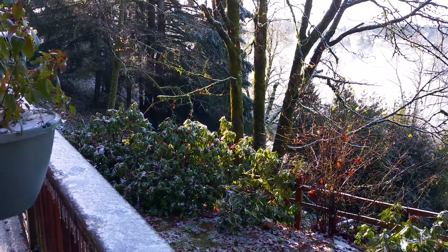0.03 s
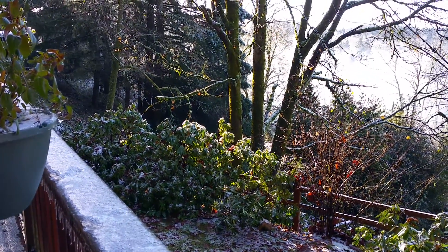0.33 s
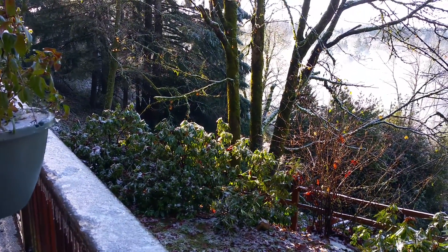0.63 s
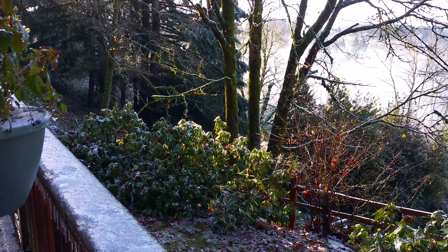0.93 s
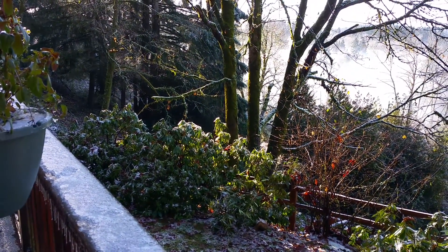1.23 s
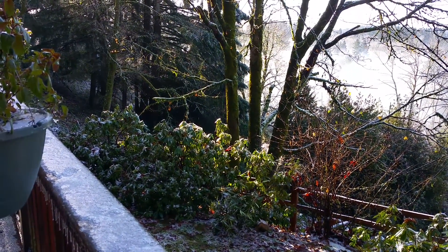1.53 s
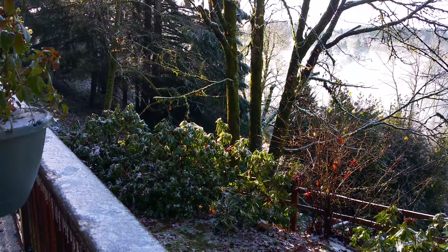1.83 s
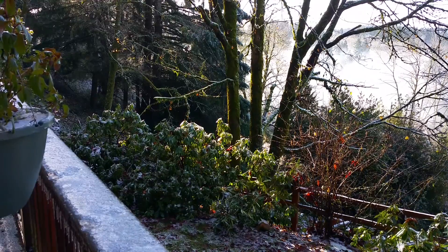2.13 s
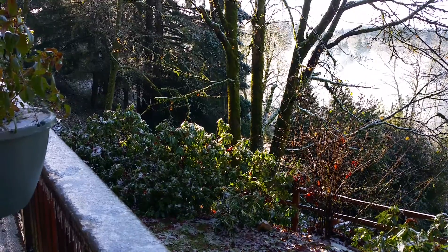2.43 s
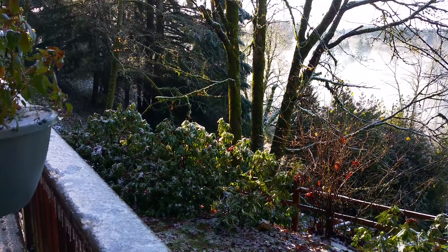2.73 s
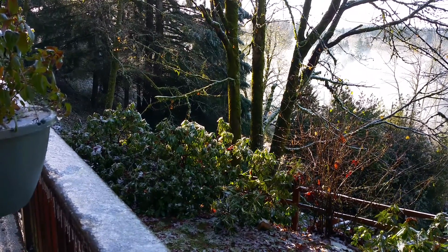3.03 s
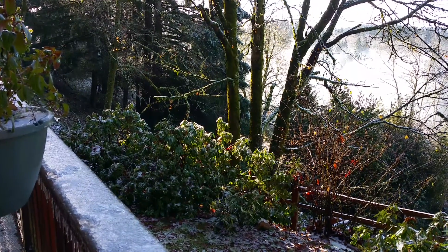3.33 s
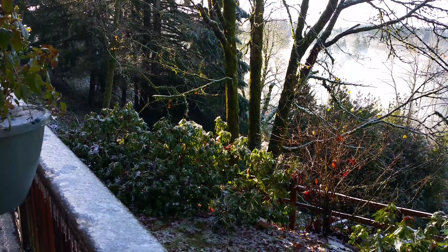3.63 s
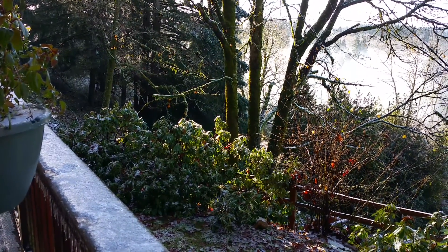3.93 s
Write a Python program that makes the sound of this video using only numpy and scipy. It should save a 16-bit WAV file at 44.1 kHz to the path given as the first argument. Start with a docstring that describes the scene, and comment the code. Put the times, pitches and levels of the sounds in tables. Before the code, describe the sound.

Uneven drops of water splash near the microphone outdoors, each with a short echo, growing louder in the second half. Underneath run a low engine hum, a pulsing faraway propeller plane, soft air rumble and faint pattering.

```python
"""A wooden deck above a lake, during a thaw. Meltwater drips close by on the right: each drop smacks
down, throws spray and traps ringing bubbles, and the house wall sends back a short echo.
Behind it are a fine patter from the trees and the low rumble of open air. An engine hums steadily some
way off, and a slowly sinking drone, like a far propeller plane, beats (pulses) against its hum."""
import sys
import numpy as np
from scipy import signal
from scipy.fft import rfft, irfft
from scipy.io import wavfile
from scipy.ndimage import uniform_filter1d

SR = 44100
rng = np.random.default_rng(int(sys.argv[2]) if len(sys.argv) > 2 else 0)


def file_out(sig):
    """Save sig as 16-bit WAV at sys.argv[1]."""
    # one column per channel
    cols = np.atleast_2d(sig).T
    # limit, then scale
    lim = np.clip(cols, -1, 1)
    pcm = np.round(lim * 32767).astype(np.int16)
    wavfile.write(sys.argv[1], SR, pcm)


N = 176400
T = np.arange(N) / SR
BUBBLE_RISE = 6  # the larger this is, the faster a bubble's pitch climbs

# Tone colour of a splash, near or far: (frequency [Hz], relative level [dB])
SPLASH_COLOUR = [(400, -20), (1300, -11), (2300, 1.5), (3300, -1), (4500, -1), (6000, 3), (7400, 2),
                 (8500, -2), (11000, -5), (14000, -9.5), (16000, -16)]


def undb(db):
    """Turn decibels into a number to multiply by."""
    return 10 ** (np.asarray(db) / 20)


def level(x, db):
    """Scale a sound to an average (rms) level."""
    return x * undb(db) / np.sqrt(np.mean(x ** 2))


def pan(db):
    """Left and right gains; positive decibels favour the left."""
    return undb(np.array([[db], [-db]]) / 2)


def wander(rate_hz):
    """A smooth random curve that strays about 1 either side of zero."""
    hold = int(SR / rate_hz)
    steps = np.repeat(rng.standard_normal(N // hold + 2), hold)
    return level(uniform_filter1d(uniform_filter1d(steps, hold), hold)[:N], 0)


def colour(x, points, tilt_db=0, ripple_db=0, slap_db=0):
    """Shape a sound's tone along (Hz, dB) points; white noise keeps its overall level."""
    n = x.shape[-1]
    bins = np.fft.rfftfreq(n, 1 / SR)
    octave = np.log2(np.maximum(bins, 1))
    hz, db = np.array(points).T
    ripple = ripple_db * np.interp(bins / 600, np.arange(64), rng.standard_normal(64))
    slap = slap_db * np.exp(-.5 * ((octave - np.log2(6250)) / .17) ** 2)  # ring of a slapped wet surface
    tilt = tilt_db * np.maximum(octave - np.log2(6000), -2)
    gain = level(undb(np.interp(octave, np.log2(hz), db) + ripple + slap + tilt), 0)
    # make the filter ring after each hit, never before it
    cepstrum = irfft(np.log(gain), n) * (1 + np.sign(np.fft.fftfreq(n)))
    return irfft(rfft(x) * np.exp(rfft(cepstrum)), n)


def wide_noise(points, wide_hz=585):
    """Shaped noise, alike in both ears in the bass and unrelated higher up."""
    mid, side = rfft(rng.standard_normal((2, N)))
    side = side * np.clip(np.fft.rfftfreq(N, 1 / SR) / wide_hz, .08, 1)
    return colour(irfft(np.array([mid + side, mid - side]), N), points)


def water_noise(size, share=.045):
    """White noise of which the two ears share a little."""
    left, right, both = rng.standard_normal((3, size))
    return np.sqrt(1 - share) * np.array([left, right]) + np.sqrt(share) * both


def bursts(hits, decay_s):
    """Turn each hit into a puff of noise that dies away."""
    return signal.lfilter([1], [1, -np.exp(-1 / (decay_s * SR))], hits) * water_noise(len(hits))


def droplets(size, per_s, spread_db):
    """A shower of tiny droplets landing at random, a few harder than the rest."""
    lands = rng.random(size) < per_s / SR
    strength = undb(spread_db * np.minimum(rng.exponential(size=size), 5))
    return level(bursts(lands * strength, decay_s=.00077), 0)


def air(db=-37.5):
    """Low outdoor rumble that wavers a little."""
    # Tone colour of the open air: (frequency [Hz], relative level [dB])
    air_colour = [(20, -10), (38, -12), (60, -12), (100, -1.5), (150, -2), (220, 2.5), (290, -3), (400, -6),
                  (520, -12), (800, -13.5), (1050, -15.5), (1350, -21), (1700, -20), (2100, -18),
                  (2600, -19.5), (3200, -32), (6000, -32.5), (16000, -57.5)]
    return undb(db + wander(6.3)) * wide_noise(air_colour)


def tree_patter(drips_per_s=69):
    """Meltwater falling from the trees: a hiss, a fine patter and small bright drips."""
    # Tone colour of the hiss and patter: (frequency [Hz], relative level [dB])
    melt_colour = [(1000, -11), (2200, -4.5), (3300, 2), (4600, 0.5), (5600, -0.5), (7300, -2), (8300, -10),
                   (11000, -9), (14000, -19), (16000, -22)]
    hiss = undb(-50 + .43 * wander(4.3)) * water_noise(N)
    patter = undb(-59) * droplets(N, per_s=250, spread_db=1.5)
    hits = (rng.random(N) < drips_per_s / SR) * rng.uniform(.38, 1, N)
    far_drips = level(bursts(hits, decay_s=.0091), -60)
    return colour(hiss + patter, melt_colour) + colour(far_drips, SPLASH_COLOUR, tilt_db=6)


def plane():
    """Propeller blades make sinking tones that fade in and out, over a roar that swells twice."""
    # How often a blade sweeps past: (time [s], rate [Hz])
    blade_rate = [(0, 96.1), (1, 94.5), (2, 93.04), (3, 91.82), (4, 90.55)]
    # Tones at 1, 2 and 3 times that rate: (time [s], first [dB], second [dB], third [dB])
    tone_levels = [(0, -28.5, -50, -67), (.5, -24.5, -44.5, -38), (1, -27.5, -37, -46),
                   (1.4, -29.5, -69, -40), (1.85, -25, -66, -39), (2.3, -28.5, -56, -44.5),
                   (2.7, -28, -62, -45), (3.3, -31, -51, -41.5), (3.75, -29, -37.5, -35.5),
                   (4, -30.5, -36, -38)]
    # Swells of the roar: (peak time [s], half width [s], level [dB])
    swells = [(0.555, 0.16, -36), (3.73, 0.18, -36.5)]
    # Tone colour of the roar: (frequency [Hz], relative level [dB])
    roar_colour = [(60, -25), (140, -10), (220, -3), (330, -13.5), (480, -11.5), (750, -20.5),
                   (1200, -30.5), (3000, -52)]
    phase = 2 * np.pi * np.cumsum(np.interp(T, *np.array(blade_rate).T)) / SR
    times, *levels = np.array(tone_levels).T
    tones = sum(undb(np.interp(T, times, db)) * np.sin((k + 1) * phase + .28 * k * wander(9.8))
                for k, db in enumerate(levels))
    shaft = undb(-51.5) * np.sin(phase * 2 / 3)  # twice per turn of the three-bladed propeller
    swell = sum(undb(db) * np.exp(-.5 * ((T - at) / width) ** 2) for at, width, db in swells)
    return np.sqrt(2) * (tones + shaft) + swell * wide_noise(roar_colour)


def engine_hum(shaft_hz):
    """Wavering tones at multiples of the shaft's rate; reflections shift the high ones between ears."""
    # Engine tones: (multiple of the shaft rate [rounded below], level [dB], left minus right [dB])
    tones = [(2, -46.5, 13), (3, -38, 3), (4, -45.5, 7.5), (5, -36.5, 3), (6, -35.5, -1), (7, -44.5, 3),
             (8, -48, 4), (9, -35.5, 3.5), (10, -40.5, 3), (11, -49, 9.5), (12, -42.5, 4), (13, -48, 10),
             (14, -53.5, -5.5), (15, -59.5, 6), (17, -58, -2), (18, -55, 8), (19, -53.5, -2),
             (22, -56.5, 4), (25, -60, 10.5), (26, -58, -1), (36, -55, 2), (51, -66.5, 18.5),
             (67.74, -60.5, 8.5)]
    out = 0
    for multiple, db, pan_db in tones:
        multiple = round(multiple)
        hz = multiple * shaft_hz
        scatter = min(hz / 650, 1)  # reflections matter more as the pitch goes up
        start_phase = rng.uniform(0, 2 * np.pi) * (multiple > 3)
        ear_shift = scatter ** 2 * np.array([[.7], [-.7]])
        waver_db = (.5 + scatter ** 2) * wander(4.77)
        phase = 2 * np.pi * hz * T + start_phase + ear_shift + .24 * scatter * wander(6.09)
        out = out + undb(db + waver_db) * pan(pan_db) * np.cos(phase)
    return np.sqrt(2) * out


def engine_whine(hz=1015):
    """One clear tone from the engine that slowly swells and fades."""
    # Loudness of the whine: (time [s], level [dB])
    loudness = [(0, -51.5), (.24, -47), (.6, -48.5), (1.0, -52.5), (1.22, -49), (1.8, -51), (2.66, -56),
                (4, -55.5)]
    ear_shift = np.array([[.3], [-.3]])
    phase = 2 * np.pi * hz * T + ear_shift + .2 * wander(4)
    return np.sqrt(2) * undb(np.interp(T, *np.array(loudness).T)) * np.sin(phase)


def engine_buzz(shaft_hz, size=2048):
    """A faint mechanical buzz that repeats with every turn of the engine's shaft."""
    # The engine's weak high overtones: (frequency [Hz], typical level of each [dB])
    overtones = [(500, -67), (800, -63), (1200, -68), (1600, -66), (2200, -74.5), (2600, -85)]
    hz, db = np.array(overtones).T
    gain = np.interp(np.arange(size // 2 + 1) * shaft_hz, hz, undb(db), left=0, right=0)
    one_turn = irfft(rfft(rng.standard_normal((2, size))) * gain) * np.sqrt(size / 2)
    position = (shaft_hz * T + .0016 * wander(4.05)) * size
    return np.array([np.interp(position, np.arange(size), ear, period=size) for ear in one_turn])


def bubble_ring(hz, age):
    """The tone of an air bubble trapped in water, rising in pitch as it ages."""
    return np.sin(2 * np.pi * hz * age * (1 + BUBBLE_RISE * age))


def plops(decay_s=.0039):
    """Small drops land in water, and each traps a bubble that rings briefly."""
    # The drops' bubbles: (time [s], starting pitch [Hz], level [dB])
    drops = [(2.000, 1560, -44), (2.002, 1900, -38.5)]
    out = 0
    for at, hz, db in drops:
        age = np.maximum(T - at, 0)
        out = out + undb(db) * np.sqrt(2) * np.exp(-age / decay_s) * bubble_ring(hz, age)
    return out


def splash_bubbles(t, within_s, count=8, low_hz=2100, high_hz=7500, decay_cycles=8):
    """Tiny bubbles ring in a splash; late ones tend to be weaker, and high ones die sooner."""
    out = 0
    for pitch, wait, strength in rng.random((count, 3)):
        hz = low_hz * (high_hz / low_hz) ** pitch
        age = np.maximum(t - wait * within_s, 0)
        fade = np.exp(-wait - age * hz / decay_cycles)
        ear_gains = rng.standard_normal((2, 1))
        out = out + strength * fade * bubble_ring(hz, age) * ear_gains
    return out


def wall_echo(x, t, delay_s=.006, fade_60db_s=.39, dull_hz=8200, db=-7.5):
    """The house wall sends back a short, duller tail of the sound."""
    tail = rng.standard_normal((2, len(t))) * np.exp(-np.log(1000) * t / fade_60db_s) * (t > delay_s)
    tail = signal.lfilter(*signal.butter(1, dull_hz, fs=SR), tail)
    tail = level(tail, db) / np.sqrt(len(t))
    return signal.fftconvolve(x, tail, axes=1)[:, :x.shape[1]]


def near_drips(size=16384, impact_decay_s=.0021, spray_rise_s=.0022):
    """Each drop smacks down, throws a spray of droplets and traps bubbles; the wall echoes it."""
    # Drops landing close by: (time [s], impact [relative dB], spray [relative dB], spray decay [s],
    # brightness [dB per octave], wet slap [dB])
    drops = [(.101, -35, -36.5, .012, -3, 0), (.13, -38, -42, .012, 0, -2),
             (.189, -29, -36.5, 0.038, -3.5, 4.5), (.437, -37, -39.5, .02, -4, -2),
             (.722, -36, -41, .008, 5, -5), (1.055, -37.5, -40, .011, 8, 2),
             (1.258, -37, -34, 0.016, -1, 2), (1.356, -28.5, -38, 0.011, -1, -1),
             (1.455, -45, -42, .021, 3, -3), (1.560, -34, -41, .009, -4, -2),
             (1.644, -43, -43, 0.0099, 4, 0), (1.702, -40, -38, .012, -5, -2),
             (1.726, -34, -33, .018, 2.5, -5), (1.742, -39, -40, .008, 4, -3),
             (1.854, -26.5, -33, 0.007, 1, -1), (1.865, -35, -42, .005, -1, -1),
             (2.061, -34.5, -36, .0068, -3, 5), (2.137, -35, -43, .0088, 4, 1),
             (2.576, -42, -46, .006, 6, 0), (2.733, -29, -37, .011, -1, 5),
             (2.741, -32, -40, 0.0067, -1, 1), (2.748, -29, -39, .006, -1, 3),
             (2.764, -29, -38, 0.01, 2, 2), (2.771, -28.5, -39, 0.016, -1.5, 2),
             (2.911, -26, -29.5, 0.02, 4.5, -3), (2.919, -22.5, -26.5, 0.024, -2, -1),
             (3.096, -35, -41, 0.025, -2.5, 0), (3.188, -39, -49, .0054, 8, -2),
             (3.256, -35, -38, 0.044, -2.5, -3), (3.334, -38, -50, .005, 15, 0),
             (3.479, -26, -31, 0.016, 1, 1), (3.489, -27, -30, 0.014, -3, 2), (3.499, -37, -36, .013, 8, 0),
             (3.613, -34, -37, .0066, -1, 0), (3.696, -33, -37.5, 0.013, -4, 0)]
    out = np.zeros((2, N + size))
    t = np.arange(size) / SR
    for at, impact_db, spray_db, decay_s, tilt_db, slap_db in drops:
        impact = undb(impact_db) * np.exp(-t / impact_decay_s) * water_noise(size)
        spray_shape = (1 - np.exp(-t / spray_rise_s)) * np.exp(-t / decay_s)
        spray = undb(spray_db) * spray_shape * droplets(size, per_s=5000, spread_db=.5)
        splash = colour(impact + spray, SPLASH_COLOUR, tilt_db, ripple_db=1.5, slap_db=slap_db)
        bubbles = undb(spray_db - 10) * splash_bubbles(t, decay_s)
        start = int(at * SR)
        out[:, start:start + size] += splash + bubbles
    return 2 * undb(-8) * (out + wall_echo(out, t))[:, :N]


def from_right(x):
    """Most of the water's sound reaches the right ear more strongly."""
    # Which side the water is heard on: (frequency [Hz], left minus right [dB])
    balance = [(1000, -21), (2300, 6.5), (2900, -2.5), (3500, -4.5), (4700, -8.5), (5400, -2.5), (6300, -5),
               (7300, -14), (8100, -4.5), (9200, -6), (10500, -1.5), (12500, -3), (14500, -1)]
    db = np.interp(np.fft.rfftfreq(N, 1 / SR), *np.array(balance).T)
    return irfft(rfft(x) * undb(np.array([db, -db]) / 2), N)


def scene(shaft_hz=29.83):
    """Engine, plane and air in the background, with the water in front."""
    engine = engine_hum(shaft_hz) + engine_whine() + engine_buzz(shaft_hz)
    background = engine + plane() + air()
    water = near_drips() + tree_patter() + plops()
    return background + from_right(water)


def record(dry, top_hz=16000):
    """Cut away the very highest treble."""
    return signal.sosfilt(signal.ellip(10, .2, 80, top_hz, fs=SR, output="sos"), dry)


dry = scene()
out = record(dry)
file_out(out)
```